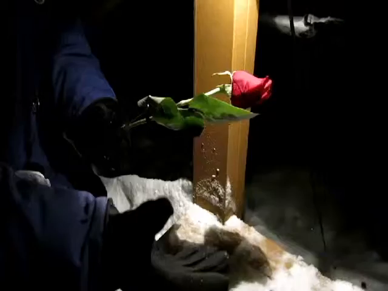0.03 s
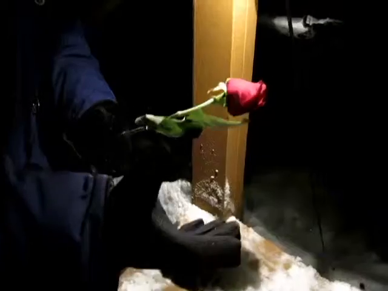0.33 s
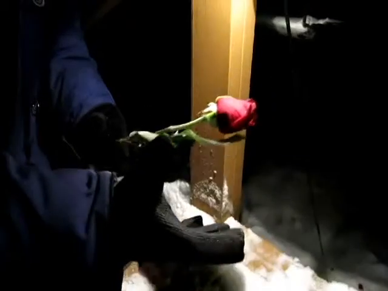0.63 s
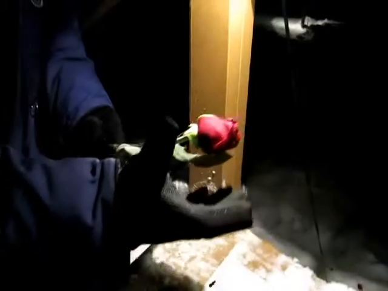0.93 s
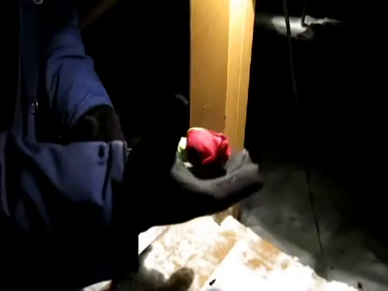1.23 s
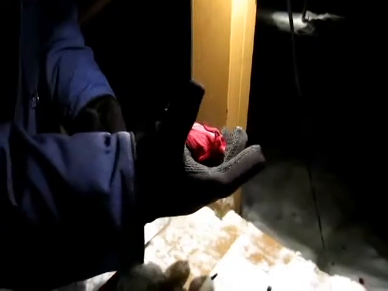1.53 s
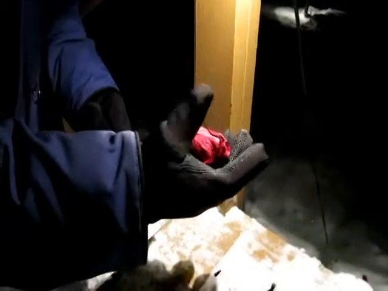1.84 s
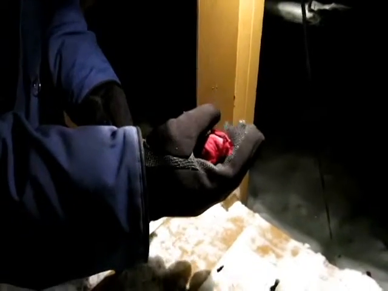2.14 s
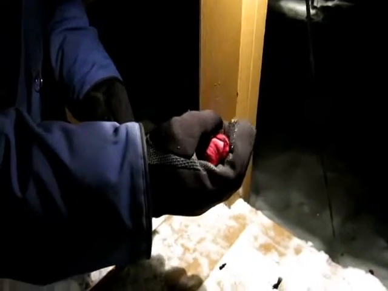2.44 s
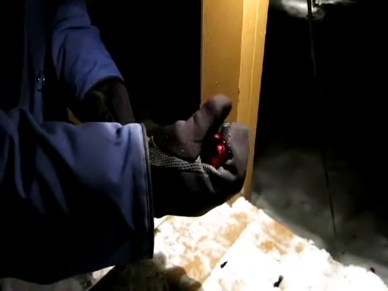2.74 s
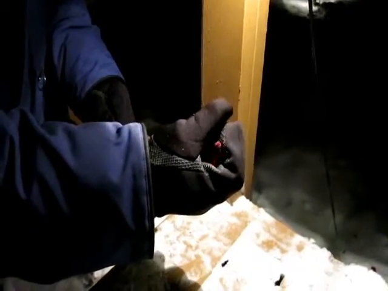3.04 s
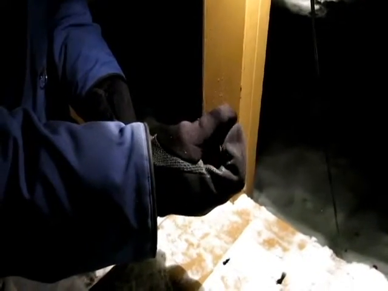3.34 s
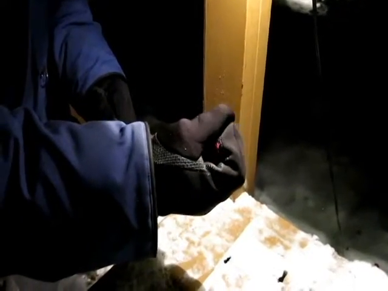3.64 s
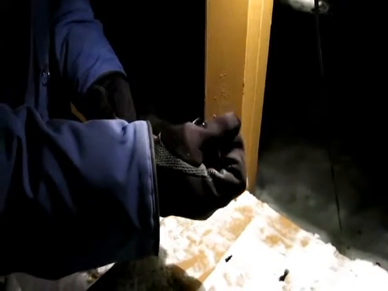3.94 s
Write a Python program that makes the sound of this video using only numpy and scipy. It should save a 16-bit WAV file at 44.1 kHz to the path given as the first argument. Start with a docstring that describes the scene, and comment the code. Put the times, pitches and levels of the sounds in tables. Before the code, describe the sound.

A frozen rose crackles as a gloved hand crushes it close up. First a sleeve swishes, leaves lightly scrape the glove from 0.3 to 1.5 seconds, and the microphone takes a soft bump at 0.7. From 2 seconds, fine brittle crackling builds with crunches and sharp snaps, loudest between 3.1 and 3.8, continuing until 4. Throughout, an engine idles on the left, throbbing, whirring and clattering.

```python
"""A frozen rose is crushed in a gloved hand, close up, outdoors at night.
Its brittle petals fizz, snap and crunch in tiny fractures, and their thick bases crack like wood.
Before the squeeze, a sleeve swishes, leaves brush the glove and the camera takes a soft knock.
An engine idles nearby on the left, throbbing, whirring and clattering.
The sharpest snaps make a limiter duck everything."""
import sys
import numpy as np
from scipy import signal
from scipy.fft import rfft, irfft
from scipy.io import wavfile
from scipy.ndimage import uniform_filter1d

SR = 44100
rng = np.random.default_rng(int(sys.argv[2]) if len(sys.argv) > 2 else 0)


def to_wav(s):
    """Save 16-bit WAV."""
    ch = np.atleast_2d(s).T  # columns
    pcm = np.round(np.clip(ch, -1, 1) * 32767)  # PCM
    wavfile.write(sys.argv[1], SR, pcm.astype(np.int16))


N = 176400
T, HZ = np.arange(N) / SR, np.fft.rfftfreq(N, 1 / SR)
MILLISECOND = .001


# Petals giving way. Each row: moment of the break in seconds, level in dB over 1 ms.
PETAL_SNAPS = [(1.667, -31.5), (2.058, -20), (2.2198, -14), (2.4355, -18.5), (2.498, -17.5), (2.524, -19),
               (2.56, -15.5), (2.580, -18.5), (2.6496, -5.5), (2.688, -10), (2.736, -9), (2.7464, -13.5),
               (2.819, -10), (2.917, -16), (2.9308, -10.5), (3.071, -23), (3.0955, -1.5), (3.1113, -9.5),
               (3.2635, -2.5), (3.2795, -9), (3.3014, -12), (3.3665, -11), (3.409, -10.5), (3.6013, -10),
               (3.62, -11), (3.736, -17), (3.763, -10.5), (3.789, -4)]

def snaps():
    """Single frozen petals break, each with one sharp snap."""
    out = np.zeros(N)
    for s, db in PETAL_SNAPS:
        add(out, s - MILLISECOND, amp(db) * shard(break_s=.00022, splinter_s=.00089))
    return out


# The glassy ring of a brittle petal. Each row: frequency in Hz, gain in dB.
PETAL_COLOUR = [(300, -34), (2300, -10.5), (3600, -12.5), (5500, -11), (8000, -5), (11800, -3),
                (14000, -10), (16000, -9)]

def shard(break_s, splinter_s, size=1024):
    """One break, 1 ms in, amid splinters, in a petal of its own colour; energy of 1 ms at rms 1."""
    t, hz = T[:size] - MILLISECOND, np.fft.rfftfreq(size, 1 / SR)
    splinters = np.exp(-abs(t) / np.where(t < 0, 2 * break_s, splinter_s))
    envelope = np.exp(-(t / break_s) ** 2) + .56 * splinters
    tint_db = 2.5 * np.interp(hz, np.linspace(0, SR / 2, 20), rng.standard_normal(20))
    snap = ring(envelope * rng.standard_normal(size), read(PETAL_COLOUR, hz) + tint_db)
    return snap / np.sqrt(np.sum(snap ** 2) / (SR * MILLISECOND))


# The crackle rides the squeeze of the hand. Each row: time in seconds, level in dB.
SQUEEZE_LEVEL = [(1.95, -73), (2.03, -43), (2.16, -52), (2.22, -43), (2.41, -36), (2.45, -42.5),
                 (2.56, -33), (2.64, -31), (2.7, -35), (2.78, -43), (2.82, -36.5), (2.89, -34.5),
                 (2.935, -33), (2.98, -35), (3.01, -32), (3.08, -34), (3.12, -27.5), (3.23, -36),
                 (3.32, -30), (3.45, -35.5), (3.52, -39), (3.67, -28), (3.77, -40.5), (3.82, -43.5),
                 (3.93, -38), (3.965, -20.5), (4, -35)]

def crackle():
    """Tiny fractures make a clumpy fizz and separate ticks of many colours, swelling with the squeeze."""
    fractures = grains(per_s=7000, spread_db=4)
    clumps = amp(6 * np.clip(drift(.0085), -2, 2))
    fizz = unit(ring(fractures * clumps, read(PETAL_COLOUR)))
    ticks, ticks_per_s, colours = np.zeros(N), 210, 20
    for _ in range(colours):
        breaks = grains(ticks_per_s / colours, spread_db=2.5)
        ticks += signal.oaconvolve(breaks, shard(break_s=.00012, splinter_s=.00048))[:N]
    return amp(curve(SQUEEZE_LEVEL)) * (amp(-.5) * fizz + amp(1) * unit(ticks))


# Glove and petals crunching. Each row: start in seconds, decay in seconds, level in dB.
FIST_CRUNCHES = [(0.136, 0.0035, -23), (1.339, 0.018, -34.5), (2.086, 0.006, -18.5), (2.816, 0.0059, -20.5),
                 (2.926, 0.011, -22.5), (3.011, 0.013, -20), (3.033, 0.01, -21.5), (3.441, 0.0053, -15),
                 (3.653, 0.0049, -11), (3.669, 0.018, -19.5), (3.961, 0.0082, -21.5)]
# The hollow of the fist. Each row: frequency in Hz, gain in dB.
FIST_COLOUR = [(200, -12.5), (2250, 3), (3500, -6), (5500, -5.5), (8500, -2), (12000, 1.5), (16000, -11)]

def crunches(rise_s=.004):
    """Short avalanches of fractures, darkened by the hollow of the fist."""
    level = np.zeros(N)
    attack = np.minimum(T / rise_s, 1)
    for s, decay_s, db in FIST_CRUNCHES:
        add(level, s, amp(db) * attack * np.exp(-np.maximum(T - rise_s, 0) / decay_s))
    return level * unit(ring(grains(per_s=5000, spread_db=-3), read(FIST_COLOUR)))


# Petal bases cracking. Each row: start in seconds, level in dB over 1 ms.
BASE_CRACKS = [(2.647, -16), (2.818, -18), (3.036, -17), (3.2625, -10), (3.442, -11)]

def cracks(pitch_hz=2200, ring_s=.0006, splinter_s=.002):
    """Thick petal bases crack with a short woody ring, each at a slightly different pitch."""
    out, t = np.zeros(N), T[:SR // 20]
    for s, db in BASE_CRACKS:
        splinters = rng.standard_normal(len(t)) * np.exp(-t / splinter_s)
        mode = np.exp(-t / ring_s) * np.sin(2 * np.pi * pitch_hz * rng.uniform(.88, 1.12) * t)
        crack = signal.fftconvolve(splinters, mode)
        add(out, s, amp(db) * crack / np.sqrt(np.sum(crack ** 2) / (SR * MILLISECOND)))
    return out


# The leaf scrapes that stand out. Each row: start in seconds, level in dB.
LEAF_SCRAPES = [(.628, -35), (.656, -31.5), (.774, -26.5), (.789, -35), (.829, -25.5), (.927, -34),
                (1.218, -33), (1.275, -28), (1.294, -32)]

def leaves(from_s=.3, to_s=1.46, per_s=28, decay_s=.0018, faint_db=-37.5):
    """Leaves brush the glove as the rose is lowered into it: a few clear scrapes, many faint ones."""
    level, age = np.zeros(N), T[:SR // 20] / decay_s
    starts = np.arange(from_s, to_s, 1 / per_s)
    scatter = rng.random((len(starts), 2))
    faint = [(s + late / per_s, faint_db - 10 * weak) for s, (late, weak) in zip(starts, scatter)]
    for s, db in LEAF_SCRAPES + faint:
        add(level, s, amp(db) * age * np.exp(1 - age))
    return level * unit(ring(rng.standard_normal(N), read(PETAL_COLOUR)))


# Where the rose sits. Each row: frequency in Hz, left over right in dB.
ROSE_PAN = [(1000, 2), (4000, .1), (7500, .7), (13000, 2.4)]

def near_hand(rose, width=.11, echo_db=-17, echo_s=.005, size=2048):
    """The glove adds brief reflections, just left of centre; shards throw their treble to either side."""
    echoes = rng.standard_normal(size) * np.exp(-T[:size] / echo_s)
    mid = rose + amp(echo_db) * signal.fftconvolve(rose, echoes / np.linalg.norm(echoes))[:N]
    treble = np.diff(mid, n=2, prepend=[0, 0])
    side = width * drift(.002) * treble
    return pan_left(np.array([mid + side, mid - side]), ROSE_PAN)


# The swish of the sleeve, settling to a faint rub. Each row: time in seconds, level in dB.
SLEEVE_LEVEL = [(.09, -30), (.11, -26), (.16, -26.5), (.22, -30), (.29, -41), (.42, -44.5)]
# The tone of stiff cloth. Each row: frequency in Hz, gain in dB.
SLEEVE_COLOUR = [(40, -19), (200, 3.5), (520, 7.5), (1800, 1), (3300, -6.5), (6000, 1), (8500, -3.5),
                 (12500, -0.5), (16000, -7)]

def sleeve(flutter_db=1.97, smear_s=.008):
    """Stiff cloth catches and slides past the microphone."""
    rub = np.array([unit(ring(grains(per_s=6000, spread_db=2.5), read(SLEEVE_COLOUR))) for _ in range(2)])
    body = rng.standard_normal(SR // 20) * np.exp(-T[:SR // 20] / smear_s)
    rub += signal.oaconvolve(rub, body[None] / np.linalg.norm(body))[:, :N]
    level = amp(curve(SLEEVE_LEVEL) + flutter_db * drift(.0098))
    return level * unit(rub + .55 * rub[::-1])  # each side bleeds into the other


# Soft knocks. Each row: centre in seconds, pitch in Hz, width in seconds, level in dB.
CAMERA_KNOCKS = [(0.674, 222, 0.0022, -10.5), (0.694, 187, .005, -22)]

def knocks():
    """The camera is nudged: dull thumps, only a few cycles long."""
    return sum(amp(db) * np.exp(-((T - s) / width) ** 2 / 2) * np.sin(2 * np.pi * hz * (T - s))
               for s, hz, width, db in CAMERA_KNOCKS)


# The wandering idle speed. Each row: time in seconds, firings per second.
FIRING_RATE = [(0, 81.3), (.5, 82), (1.4, 79.2), (2.3, 79), (2.8, 81), (4, 78.7)]

def engine():
    """An idling engine hums, clatters and whirrs, all locked to its cycle of eight firings."""
    cycle = np.cumsum(curve(FIRING_RATE)) / SR / 8
    return exhaust(cycle) + clatter(cycle) + whirrs(cycle)


# The strong exhaust tones. Each entry: pitch as a multiple of the cycle rate.
EXHAUST_ORDERS = [8, 10, 12, 13, 14, 15, 16, 18, 19, 29, 59]
# Their balance, in the same order. Each entry: level in dB.
EXHAUST_DB = [-33.5, -42.5, -41, -46, -44.5, -43.5, -37, -45.5, -51, -51, -48.5]

def exhaust(cycle, waver=.15, throb_place=.42, lag_cycles=.09):
    """Wavering exhaust tones beat into a throb once a cycle; the lower ones peak later."""
    hum = np.zeros(N)
    for order, db in zip(EXHAUST_ORDERS, EXHAUST_DB):
        turns = order * (cycle - throb_place) + lag_cycles * (order - 16) ** 2 / 2
        hum += amp(db) * np.sqrt(2) * (1 + waver * drift(.047)) * np.sin(2 * np.pi * turns)
    return hum


# The dark tone of clatter and fan wash. Each row: frequency in Hz, gain in dB.
CLATTER_COLOUR = [(20, -7), (95, 3), (150, 3), (260, 4), (750, -2), (1450, -4.5), (1800, -10),
                  (2500, -10.5), (3500, -26.5), (4800, -26.5), (7000, -53), (11000, -43), (16000, -49)]
# Wide in the bass, narrow on top. Each row: frequency in Hz, left-right likeness from 0 to 1.
CLATTER_LIKENESS = [(100, 0.1), (300, 0.46), (1000, 0.52), (10000, 1)]

def clatter(cycle, level_db=-34.5, repeat_share=.3):
    """Engine clatter and fan wash: noise that, above 200 Hz, partly repeats with each cycle."""
    loop = rng.standard_normal((2, SR // 10))
    repeating = rfft(loop[:, (cycle % 1 * (SR // 10)).astype(int)])
    fresh = rfft(rng.standard_normal((2, N)))
    share = repeat_share * np.clip(HZ / 200 - 1, 0, 1)
    left, apart = (np.sqrt(share) * repeating + np.sqrt(1 - share) * fresh) * amp(read(CLATTER_COLOUR))
    likeness = read(CLATTER_LIKENESS)
    right = likeness * left + np.sqrt(1 - likeness ** 2) * apart
    return amp(level_db) * unit(irfft(np.array([left, right])))


# The engine's whirrs. Each row: start in the cycle from 0 to 1, pitch in Hz, level in dB.
ENGINE_WHIRRS = [(.33, 968.4, -35.5), (.46, 1097, -45), (.72, 1539, -42.5), (.85, 1335, -40.5),
                 (.99, 1057, -44)]

def whirrs(cycle, length_cycles=.29, pitch_fall=.03):
    """Slightly rough resonances swell and slide down, one after another, in every engine cycle."""
    out = np.zeros(N)
    for place, hz, db in ENGINE_WHIRRS:
        age = np.minimum((cycle - place) % 1 / length_cycles, 1)
        phase = 2 * np.pi * np.cumsum(hz * (1 - pitch_fall * (age - .5))) / SR
        rough_tone = np.cos(phase) + .5 * drift(.013) * np.sin(phase)
        out += amp(db) * np.sin(np.pi * age) * rough_tone
    return out


def grains(per_s, spread_db):
    """A train of tiny clicks of random sign and size, at rms 1."""
    size = amp(spread_db * np.minimum(rng.exponential(1, N), 4))
    return unit(size * rng.choice([-1, 1], N) * (rng.random(N) < per_s / SR))


def ring(x, db):
    """Colours a sound with a gain per frequency bin, ringing only after each hit (minimum phase)."""
    log_gain = np.log(amp(np.r_[db, db[-2:0:-1]]))
    return irfft(rfft(x) * np.exp(np.conj(signal.hilbert(log_gain)))[:len(db)])


def drift(seconds):
    """Smooth random motion of rms 1."""
    return unit(irfft(rfft(rng.standard_normal(N)) * np.exp(-(HZ * seconds) ** 2)))


def pan_left(x, table):
    """Tips a sound to the left by a table of level differences."""
    return irfft(rfft(x) * amp(np.outer([.5, -.5], read(table))))


def amp(db):
    """Decibels to gain."""
    return 10 ** (np.asarray(db) / 20)


def unit(x):
    """Scales to rms 1."""
    return x / np.sqrt(np.mean(x ** 2) + 1e-20)


def curve(points):
    """A control curve at every sample."""
    return np.interp(T, *np.transpose(points))


def read(points, hz=HZ):
    """Reads a spectrum table along a log-frequency axis."""
    f, value = np.transpose(points)
    return np.interp(np.log(hz + 1), np.log(f), value)


def add(mix, s, sound):
    """Mixes a sound in at s seconds."""
    part = mix[max(round(s * SR), 0):][:len(sound)]
    part += sound[:len(part)]


# Where sleeve, knocks and engine sit. Each row: frequency in Hz, left over right in dB.
BACKGROUND_PAN = [(40, 1.5), (80, 2.5), (250, 2.6), (700, 4.8), (1300, 4.5), (3000, 1.5)]

def scene():
    """The rose in front; sleeve, knocks and engine to the left."""
    rose = near_hand(leaves() + snaps() + crunches() + crackle())
    return rose + pan_left(sleeve() + knocks() + engine(), BACKGROUND_PAN)


def record(dry, limit_db=-12.5, attack_s=.0011, recover_db_per_s=9.5, start_s=.097, top_hz=16000):
    """A limiter ducks fast and recovers slowly; then a quick fade-in, clipping and a low-pass."""
    power_db = 10 * np.log10(abs(uniform_filter1d((dry ** 2).mean(0), size=44)) + 1e-12)
    recovery_db = T * recover_db_per_s
    held_db = np.maximum.accumulate(power_db + recovery_db) - recovery_db
    over_db = np.maximum(held_db - limit_db, 0)
    pole = np.exp(-1 / (attack_s * SR))
    duck_db = signal.lfilter([1 - pole], [1, -pole], over_db)
    fade_in = np.clip((T - start_s) / .0095, 0, 1)
    clipped = np.clip(dry * amp(-duck_db) * fade_in, -1, 1)
    low_pass = signal.firwin(255, top_hz, window=("kaiser", 8), fs=SR)
    return signal.oaconvolve(clipped, low_pass[None], "same")


dry = scene()
out = record(dry)
to_wav(out)
```